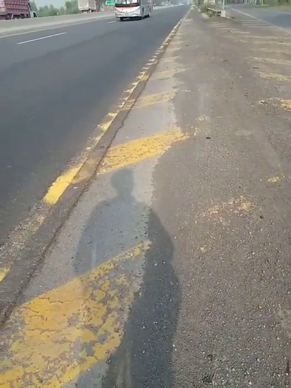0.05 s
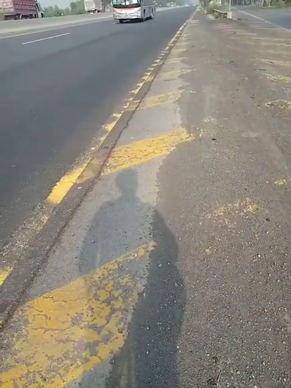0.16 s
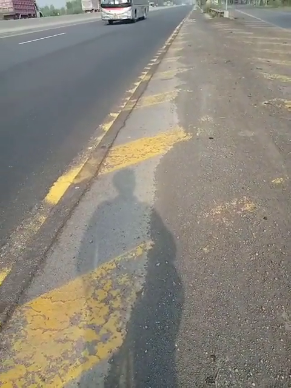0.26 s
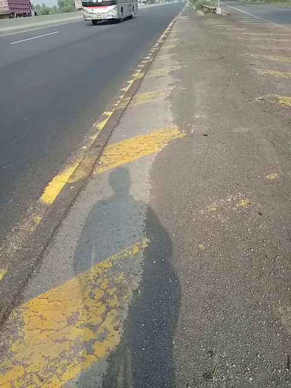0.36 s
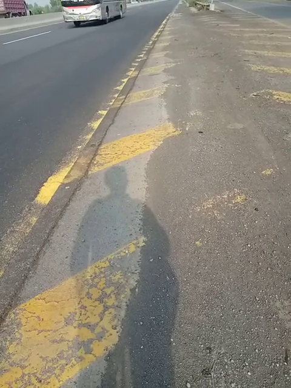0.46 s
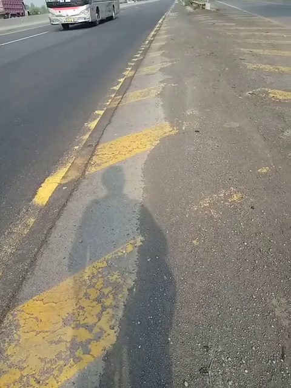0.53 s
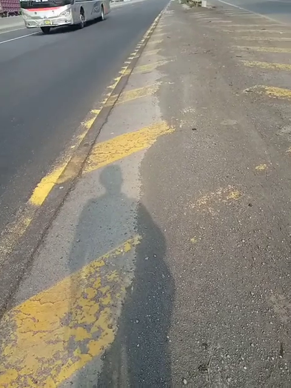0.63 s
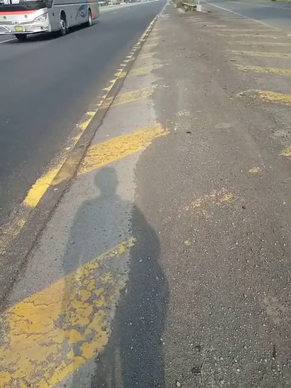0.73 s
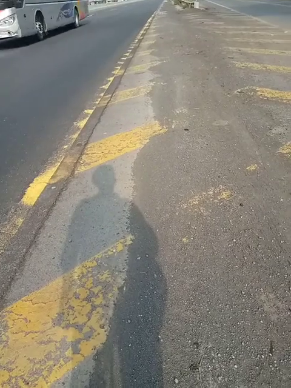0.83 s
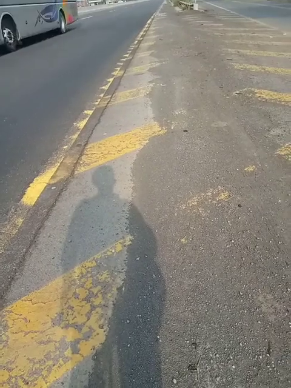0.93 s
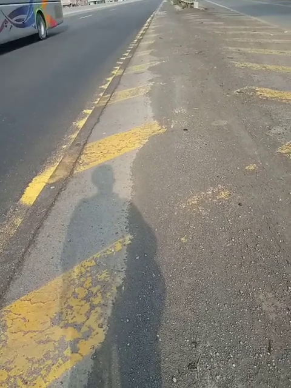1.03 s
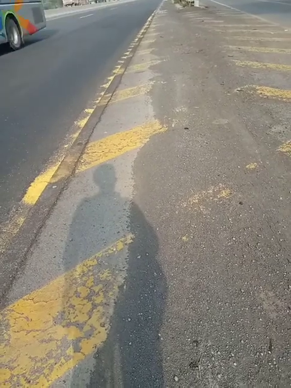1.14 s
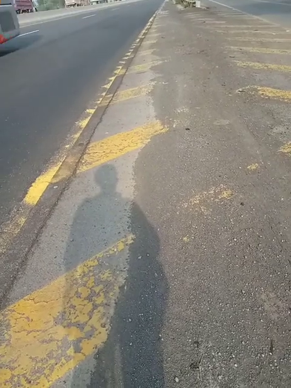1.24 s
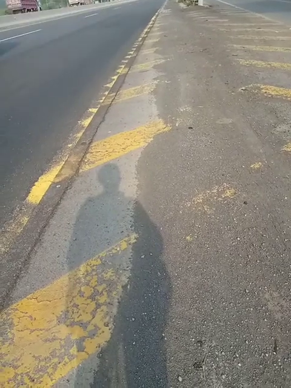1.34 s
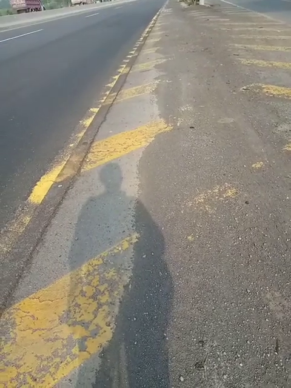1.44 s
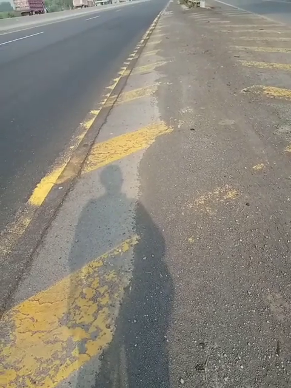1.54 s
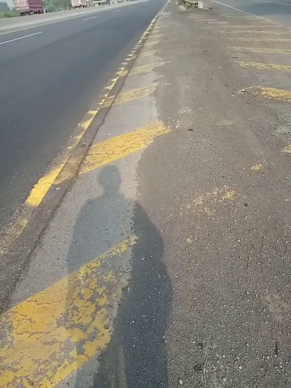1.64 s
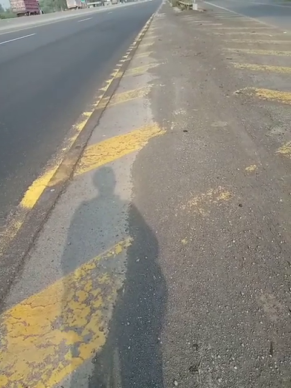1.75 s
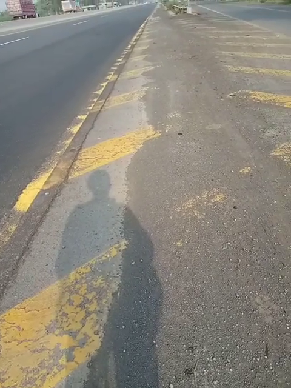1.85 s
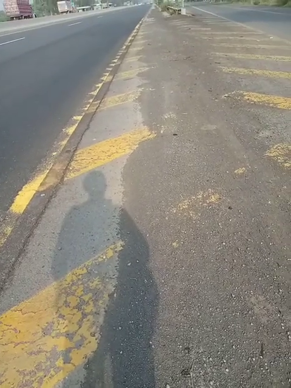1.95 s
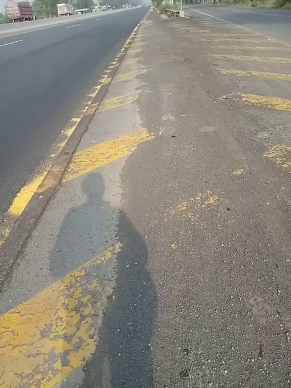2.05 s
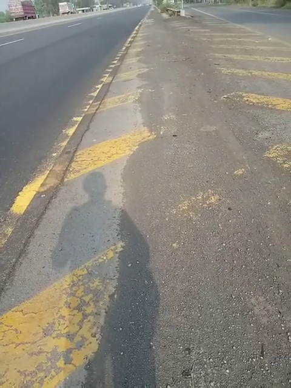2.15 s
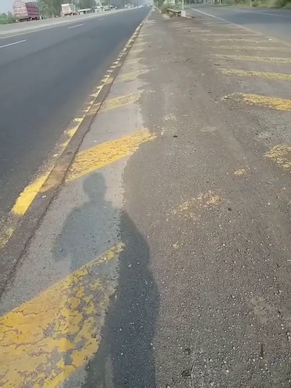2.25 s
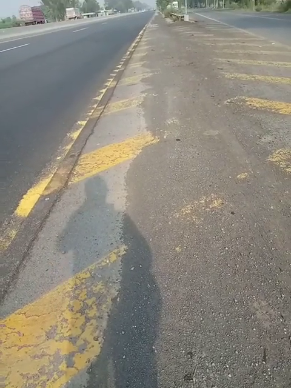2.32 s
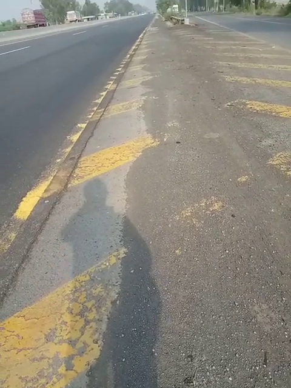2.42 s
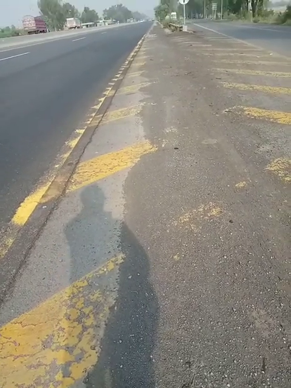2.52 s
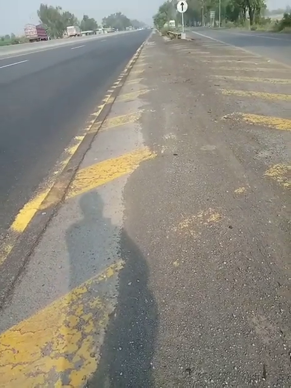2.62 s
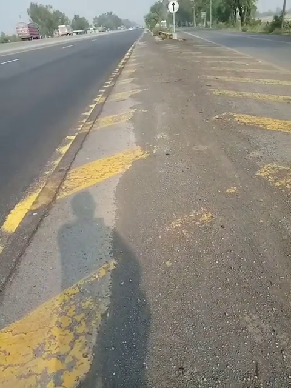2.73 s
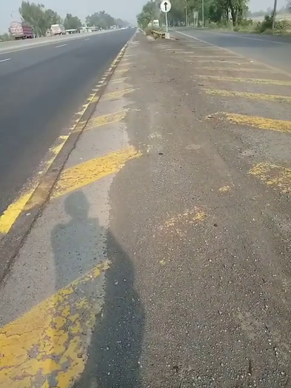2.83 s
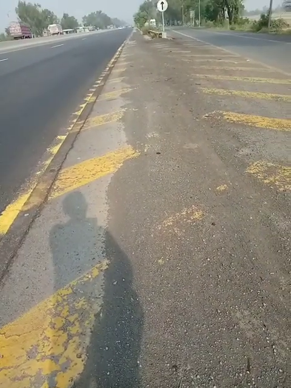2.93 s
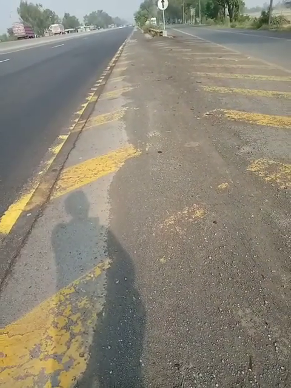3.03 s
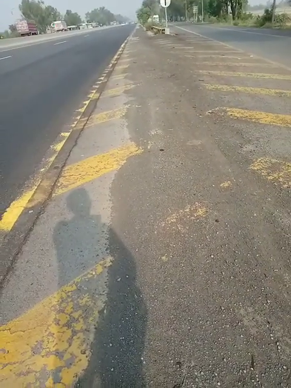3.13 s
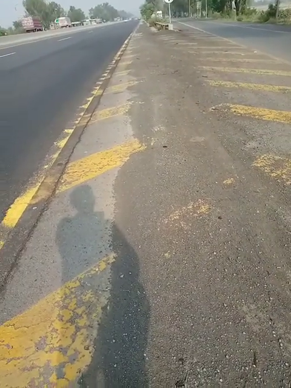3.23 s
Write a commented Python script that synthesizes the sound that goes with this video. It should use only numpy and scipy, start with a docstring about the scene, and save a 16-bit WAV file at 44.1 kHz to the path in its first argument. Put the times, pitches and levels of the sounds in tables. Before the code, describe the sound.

One bus rushes by at speed, its drone dropping in pitch, then small bird chirps follow.

```python
"""A bus passes close by at highway speed: tyre roar ahead of it, engine and fan alongside, then
the exhaust drone, lowered in pitch, as it draws away. Its roars are shaped noises that swell and
fade; its engine and fan are sines under Doppler shift and spreading loss. A small bird calls four
times as the roar fades (arched sine partials), and a piece of grit ticks once (a decaying sine).
Distant traffic, also shaped noise, hums throughout."""
import sys
import numpy as np
from scipy import signal
from scipy.fft import rfft, irfft
from scipy.io import wavfile
from scipy.ndimage import uniform_filter1d

SR = 44100
rng = np.random.default_rng(int(sys.argv[2]) if len(sys.argv) > 2 else 0)


def unload_audio(sound):
    """Save the sound as a 16-bit wav file, at the path given as the first command line argument."""
    columns = np.transpose(np.atleast_2d(sound))
    # keep every value between -1 and 1, then stretch to whole-number steps
    steps = np.round(np.clip(columns, -1, 1) * 32767)
    wavfile.write(sys.argv[1], SR, steps.astype(np.int16))


N = 145530
HOP = 256  # samples per noise frame; the window is four hops
TIME = np.arange(N) / SR
FRAME_S = np.arange(N // HOP + 5)[:, None] * HOP / SR
BIN_HZ = np.fft.rfftfreq(4 * HOP, 1 / SR)


def amp(db):
    """Decibels to gain."""
    return 10 ** (np.asarray(db) / 20)


def unit(x):
    """Scales to rms 1."""
    return x / np.sqrt(np.mean(x ** 2) + 1e-20)


def add(mix, start_s, sound):
    """Mixes a sound in at a time."""
    part = mix[round(start_s * SR):][:len(sound)]
    part += sound[:len(part)]


def drift(rate_hz):
    """Slow random motion of rms 1: white noise under a Gaussian low-pass."""
    spectrum = rfft(rng.standard_normal(N))
    lowpass = np.exp(-(np.fft.rfftfreq(N, 1 / SR) / rate_hz) ** 2)
    return unit(irfft(spectrum * lowpass, N))


def colour(points):
    """Gain per bin from a spectrum, interpolated over log frequency, at rms 1."""
    hz, db = np.transpose(points)
    return unit(amp(np.interp(np.log(BIN_HZ + 1), np.log(hz + 1), db)))


def noise(gain, patchy_db):
    """Noise with a gain over time and frequency, mottled by turbulence (patchy_db rms)."""
    real, imag, mottle = rng.standard_normal((3, len(FRAME_S), len(BIN_HZ)))
    mottle = uniform_filter1d(mottle, size=10, axis=0)
    patches = unit(uniform_filter1d(mottle, size=9, axis=1))
    frames = (real + 1j * imag) * gain * amp(patchy_db * patches)
    sound = signal.istft(frames.T, nperseg=4 * HOP, noverlap=3 * HOP)[1][:N]
    return sound * np.sqrt(3 / (4 * HOP))


def roar(spectrum, level, patchy_db):
    """A noise of fixed colour that swells and fades."""
    level_db = np.interp(FRAME_S, *np.transpose(level))
    return noise(colour(spectrum) * amp(level_db), patchy_db)


def moving_band(curve, width_hz, patchy_db):
    """A Gaussian band of noise whose centre and level move."""
    s, hz, db = np.transpose(curve)
    offset_hz = BIN_HZ - np.interp(FRAME_S, s, hz)
    band = np.exp(-.5 * (offset_hz / width_hz) ** 2)
    band = band * BIN_HZ / (BIN_HZ + 200)  # less bass
    level_db = np.interp(FRAME_S, s, db, left=-100)
    return noise(unit(band) * amp(level_db), patchy_db)


def tyres_ahead():
    """Tyre roar ahead of the bus: coloured noise that swells, then fades as the bus arrives."""
    # Tyre noise spectrum. Each row: frequency in Hz, relative density in dB.
    spectrum = [(25, -26.5), (45, -24), (75, -19.5), (120, -4.5), (190, 2), (350, -8.6), (580, -11.5),
                (900, -16), (1300, -20), (2100, -28), (2700, -23), (3400, -22.5), (5300, -31.5),
                (6400, -28.5), (7200, -37.5), (8300, -55.5), (10000, -53), (13500, -65.5), (15000, -54)]
    # Swell of the roar. Each row: time in seconds, level in dB.
    level = [(0, -50), (.35, -46.5), (.6, -38), (.9, -31), (1.08, -27), (1.3, -30.5), (1.55, -39),
             (1.8, -66)]
    return roar(spectrum, level, patchy_db=1.55)


def body():
    """Broad noise of the bus body around the closest point."""
    # Body noise spectrum. Each row: frequency in Hz, relative density in dB.
    spectrum = [(25, -29.5), (50, -31), (100, -5.5), (180, 1.5), (350, -6.5), (600, -6.5), (1000, -12.5),
                (2000, -21.5), (3000, -26.5), (4800, -24.5), (6500, -28.5), (8200, -46.5), (11000, -58.5),
                (13700, -55.5), (15000, -47.5)]
    # Swell of the body noise. Each row: time in seconds, level in dB.
    level = [(.85, -55), (1.1, -34.5), (1.25, -26.5), (1.45, -23), (1.68, -23.5), (1.8, -31), (2.0, -54)]
    return roar(spectrum, level, patchy_db=0.7)


def engine_bay():
    """Noise of the engine bay, a short swell with uneven treble."""
    # Engine bay noise spectrum. Each row: frequency in Hz, relative density in dB.
    spectrum = [(25, -31), (50, -23.5), (100, -3.5), (170, -1), (350, -6.5), (850, -2), (1300, -11),
                (1800, -14.5), (2600, -9.5), (3500, -20.5), (4350, -13), (5100, -25.8), (6100, -16.5),
                (8200, -41), (13700, -57.5), (15000, -40)]
    # Swell of the bay noise. Each row: time in seconds, level in dB.
    level = [(1.3, -51), (1.6, -29.5), (1.72, -27.5), (1.78, -24.5), (1.85, -27), (1.93, -32.5),
             (2.15, -53)]
    return roar(spectrum, level, patchy_db=1.9)


def tyres_behind():
    """Tyre roar behind the bus: deeper coloured noise that fades as it draws away."""
    # Tyre noise spectrum. Each row: frequency in Hz, relative density in dB.
    spectrum = [(25, -34), (50, -10.5), (85, -3.5), (160, 3.5), (280, -6), (420, -12), (880, -15.5),
                (1700, -22), (2500, -27.5), (3000, -21), (3600, -36), (4250, -25.5), (4700, -30),
                (6000, -30.5), (7000, -41.5), (8500, -64.5), (12000, -78)]
    # Swell and fade of the roar. Each row: time in seconds, level in dB.
    level = [(1.7, -52), (1.88, -30), (2.05, -27), (2.199, -32), (2.4, -39), (2.7, -43), (3.3, -53)]
    return roar(spectrum, level, patchy_db=1.07)


def wheel_hiss():
    """A hiss that rises as the wheels go by: a narrow band of noise with a moving centre."""
    # Path of the hiss. Each row: time in seconds, centre in Hz, level in dB.
    hiss_path = [(1.3, 4900, -55), (1.5, 4950, -43), (1.59, 5200, -39), (1.67, 6000, -37), (1.8, 6000, -44),
                 (2.1, 5600, -56), (2.6, 5200, -70)]
    return moving_band(hiss_path, width_hz=600, patchy_db=1.0)


def place(t, nearest_s, speed_m_per_s):
    """Spreading loss of a point on the bus and its bearing, -1 ahead to 1 behind."""
    nearest_m = 6.0
    along_m = speed_m_per_s * (t - nearest_s)
    distance_m = np.hypot(along_m, nearest_m)
    return nearest_m / distance_m, along_m / distance_m


def engine():
    """Unsteady engine and fan tones, Doppler-shifted down in pitch as the bus goes by."""
    # Engine and fan tones. Each row: multiple of the firing rate, then level in dB ahead, alongside
    # and behind, before spreading loss and shielding.
    tones = [(1, -46, -47.5, -24), (1.5, -33, -41, -35), (2, -24, -30, -28.5), (2.31, -23.5, -34, -48),
             (3, -38, -43, -41), (4.12, -29, -29, -47), (4.62, -31.5, -47, -53)]
    pass_s, speed_m_per_s, firing_hz = 1.73, 27.0, 114.5
    wobble, shake_db, jitter_rad = 0.0029, 2.5, 0.22  # rms of rate (share), level and phase
    shield_db = -19  # the body hides the engine from far ahead
    near, bearing = place(TIME, pass_s, speed_m_per_s)
    doppler = 1 + speed_m_per_s / 343 * bearing  # 343 m/s: speed of sound
    turns = np.cumsum(firing_hz * (1 + wobble * drift(12.6)) / doppler) / SR
    out = np.zeros(N)
    for multiple, *around_db in tones:
        db = np.interp(bearing, [-1, 0, 1], around_db) + shake_db * drift(11.2)
        phase = 2 * np.pi * multiple * turns + jitter_rad * drift(13)
        out += amp(db) * np.sqrt(2) * np.sin(phase)
    return out * near * amp(shield_db * np.maximum(-bearing, 0) ** 24)


def bird():
    """Thin arched whistles: partials 2 to 4 of a fundamental that is itself left out."""
    # Bird calls. Each row: start in seconds, length in seconds, top pitch of the fundamental in Hz,
    # second partial in dB, third partial in dB, accent on the second partial by the end in dB.
    calls = [(2.418, .12, 2220, -66, -60.5, 16), (2.659, .12, 2105, -50.5, -65, -1),
             (2.907, .119, 2000, -49, -64, 0), (3.155, 0.125, 1994, -49, -63, -0.5)]
    # Pitch within a call. Each row: share of its length, share of the top pitch.
    arch = [(0, .91), (.14, .968), (.32, .995), (.5, 1), (.72, .99), (.86, .955), (1, .81)]
    rise_s, fall_s = .018, 0.013
    fourth_db = -60  # gain reached at the end of the call
    partial_top_hz = 6900  # partials fade above this
    out = np.zeros(N)
    for start_s, length_s, top_hz, second_db, third_db, accent_db in calls:
        t = np.arange(0, length_s, 1 / SR)
        share = t / length_s
        hz = top_hz * np.interp(share, *np.transpose(arch))
        hz = hz * (1 + 0.0015 * drift(150)[:len(t)])
        phase = 2 * np.pi * np.cumsum(hz) / SR
        rise = np.minimum(t / rise_s, 1) ** .5
        fall = np.minimum((length_s - t) / fall_s, 1) ** .5
        second = amp(second_db + accent_db * share ** 3)
        fourth = amp(fourth_db) * share ** 6
        call = np.zeros(len(t))
        for k, gain in enumerate((second, amp(third_db), fourth), 2):
            call += gain * np.sin(k * phase) / (1 + (k * hz / partial_top_hz) ** 20)
        add(out, start_s, np.sqrt(2) * rise * fall * call)
    return out


def grit():
    """One tiny stone ticks: a sine under a fast rise and exponential decay."""
    start_s, tone_hz, peak_db = .4693, 6450, -35
    envelope_s = 0.00069  # the envelope peaks at half this time
    t = np.maximum(TIME - start_s, 0)
    envelope = 2 * t / envelope_s * np.exp(1 - 2 * t / envelope_s)
    return amp(peak_db) * envelope * np.sin(2 * np.pi * tone_hz * t)


def far_tyres():
    """Tyre noise of the far lanes: a band of noise whose centre climbs, then drops."""
    # Path of the band. Each row: time in seconds, centre in Hz, level in dB.
    band_path = [(2.2, 1720, -66), (2.6, 1900, -52), (2.85, 2070, -53.5), (3.08, 685, -52), (3.3, 600, -46)]
    return moving_band(band_path, width_hz=550, patchy_db=0.9)


def oncoming_traffic():
    """Distant oncoming traffic: coloured noise, mostly bass."""
    # Oncoming traffic spectrum. Each row: frequency in Hz, relative density in dB.
    spectrum = [(25, -22), (45, -16.5), (80, 2), (200, 4.4), (330, -0.5), (600, -7.5), (1000, -12.5),
                (1500, -22.5), (2700, -23.5), (3400, -26), (5000, -39.5), (6400, -35), (8200, -65),
                (11000, -70)]
    # Level over time. Each row: time in seconds, level in dB.
    level = [(1.5, -47), (2.3, -37), (2.7, -39), (3.3, -38.5)]
    return roar(spectrum, level, patchy_db=1.4)


def leaving_traffic():
    """Distant traffic leaving: smooth bass-heavy noise that fades."""
    # Leaving traffic spectrum. Each row: frequency in Hz, relative density in dB.
    spectrum = [(25, -27), (45, -20), (80, 2.7), (200, 2.5), (310, -1.5), (500, -18.5), (1000, -21.5),
                (1400, -27), (2100, -32.5), (3400, -26), (5200, -37), (6600, -31), (8400, -64),
                (10500, -72), (13000, -68.5)]
    # Level over time. Each row: time in seconds, level in dB.
    level = [(0, -37), (.55, -34), (1.2, -46.5), (2.2, -51.5), (3.3, -60)]
    return roar(spectrum, level, patchy_db=0.0)


def scene():
    """The bus, the bird, the grit and the other traffic."""
    bus = tyres_ahead() + body() + engine_bay() + tyres_behind() + wheel_hiss() + engine()
    far = far_tyres() + oncoming_traffic() + leaving_traffic()
    return (bus + bird() + grit() + far)[None]


def record(dry):
    """The microphone's bass roll-off and the band limit."""
    bass_cut = signal.butter(2, 45, "highpass", fs=SR, output="sos")
    thin = signal.sosfilt(bass_cut, dry)
    band_limit = signal.firwin(511, 15800, window=("kaiser", 9), fs=SR)
    return signal.oaconvolve(thin, band_limit[None], "same")


dry = scene()
out = record(dry)
unload_audio(out)
```